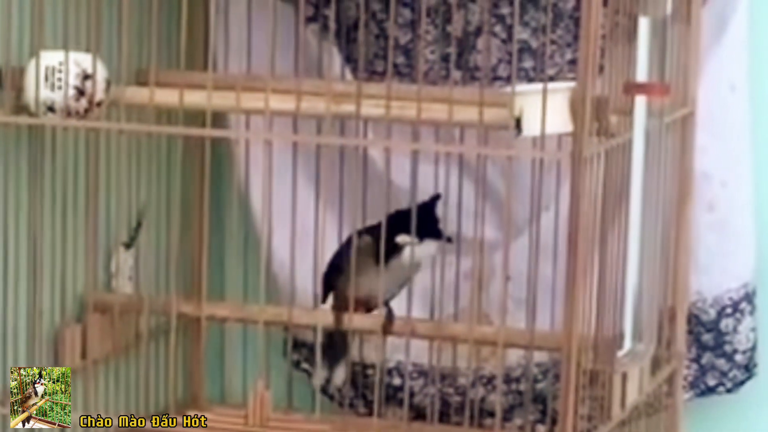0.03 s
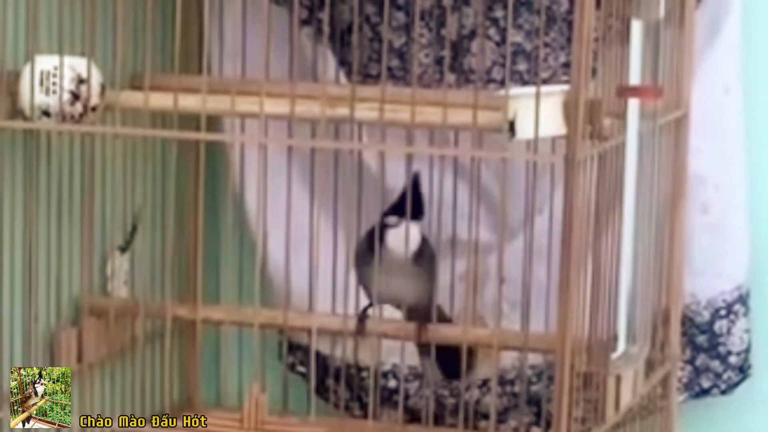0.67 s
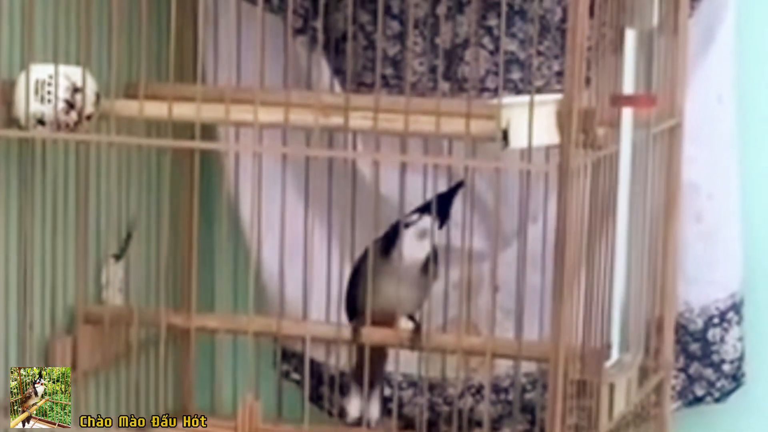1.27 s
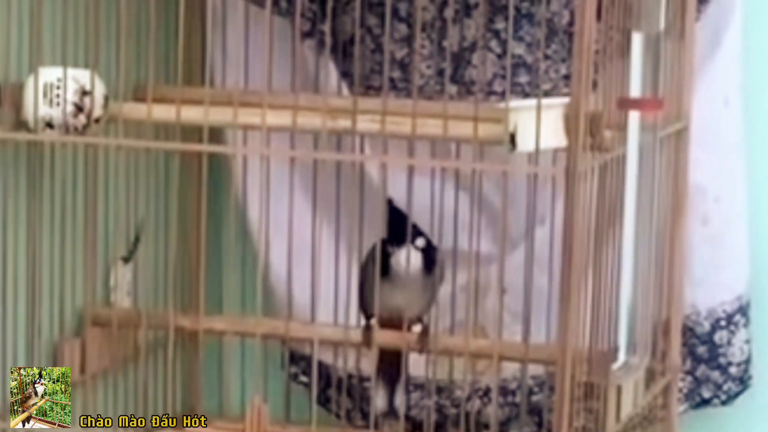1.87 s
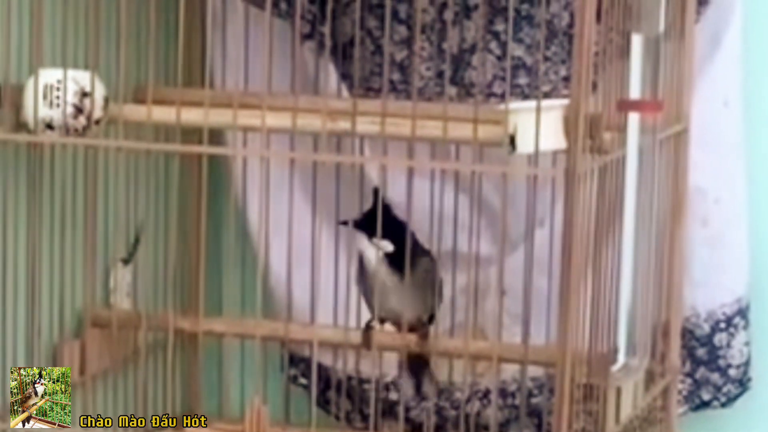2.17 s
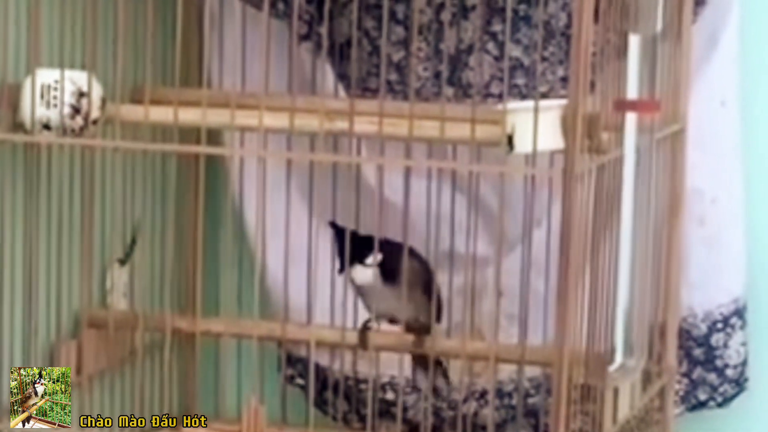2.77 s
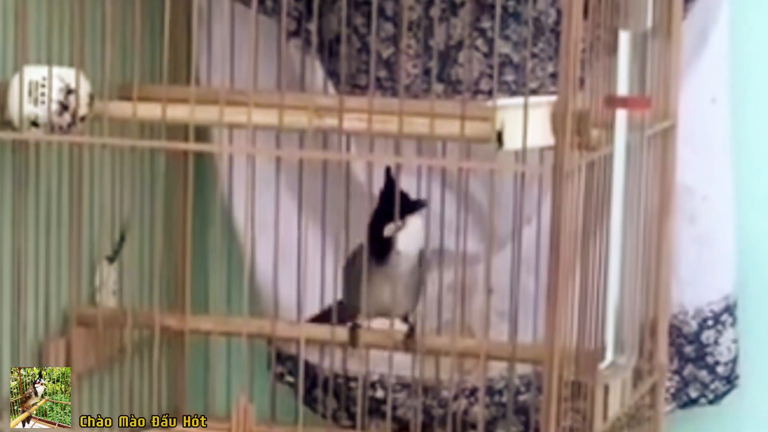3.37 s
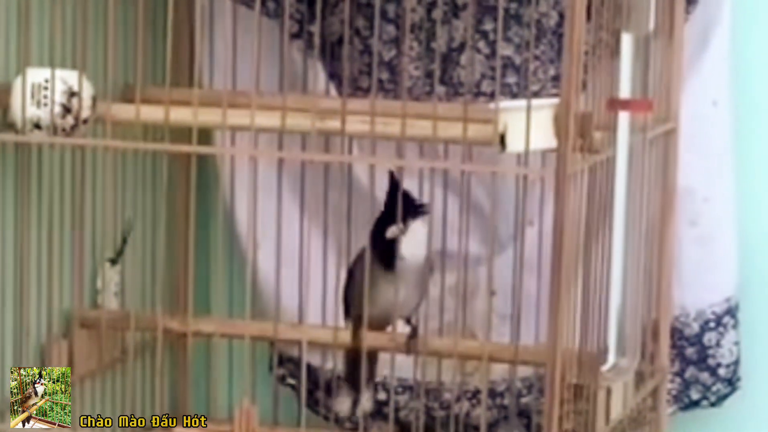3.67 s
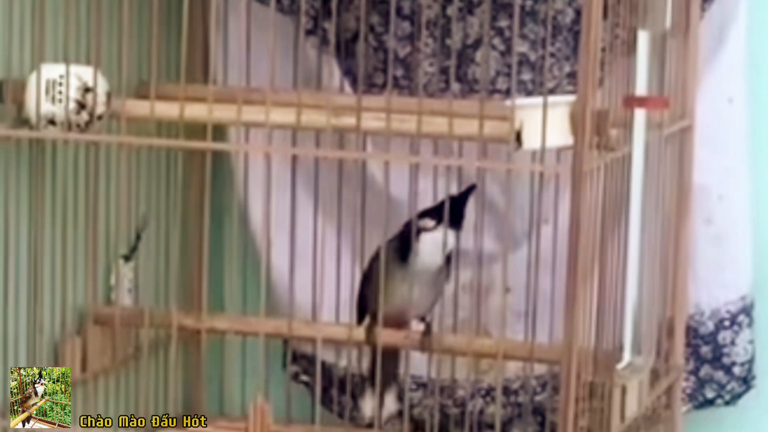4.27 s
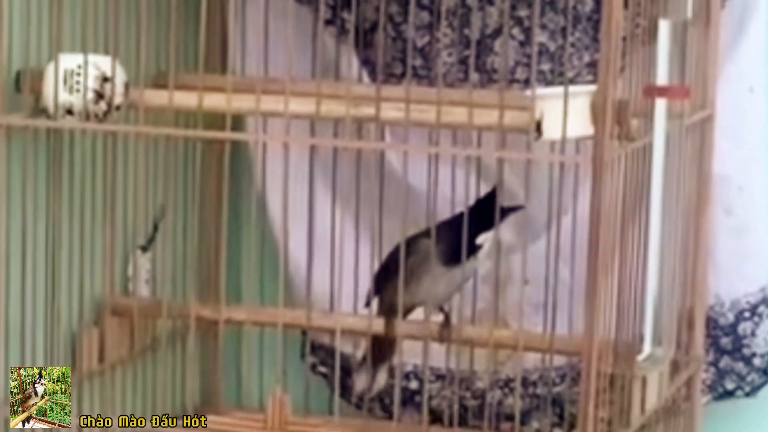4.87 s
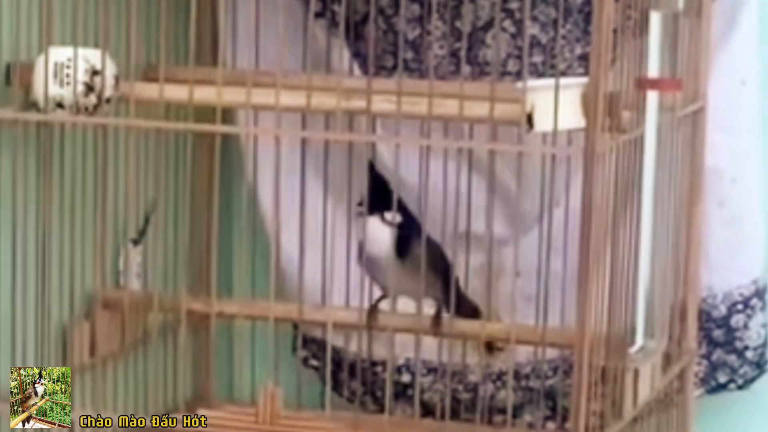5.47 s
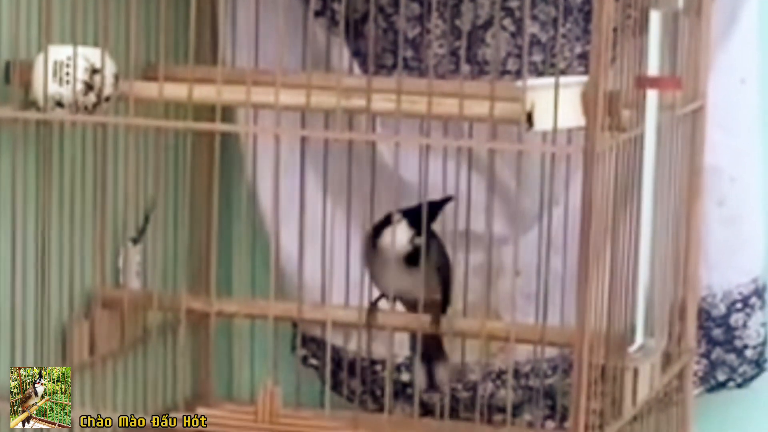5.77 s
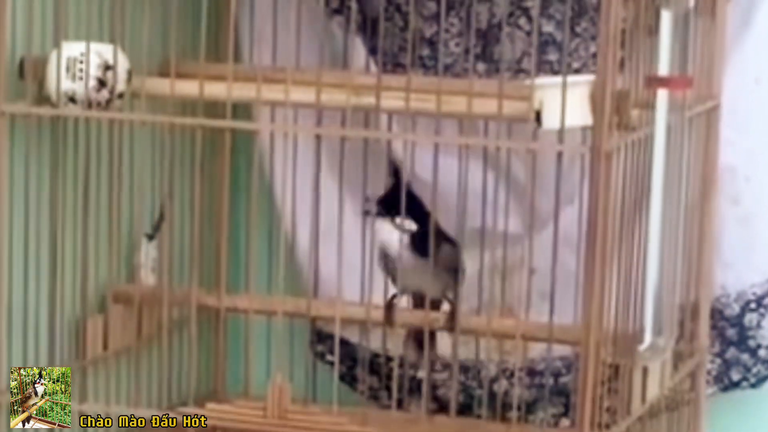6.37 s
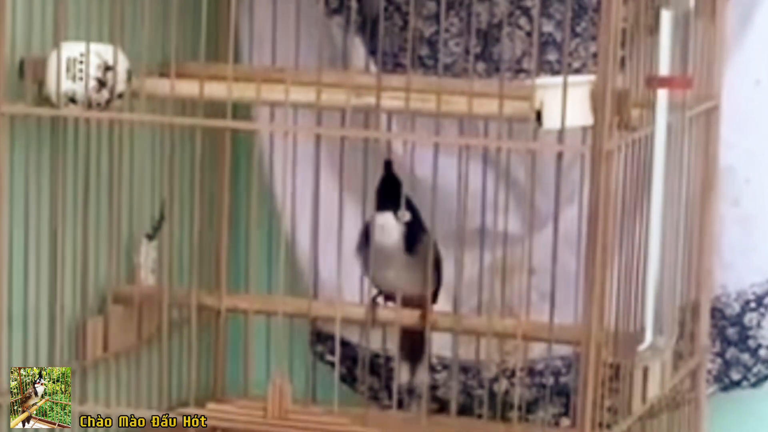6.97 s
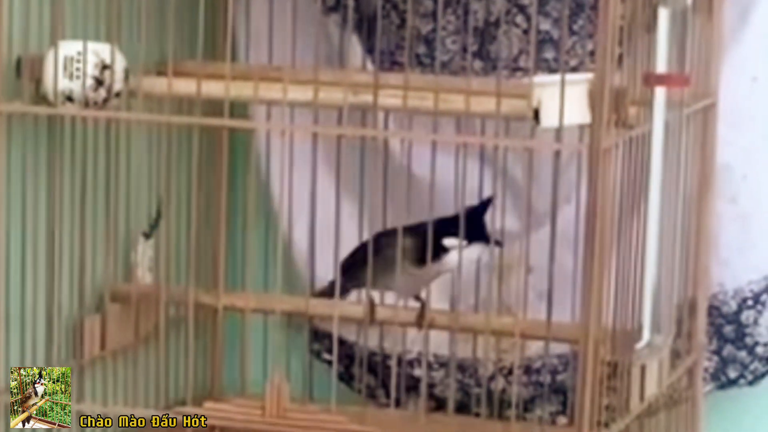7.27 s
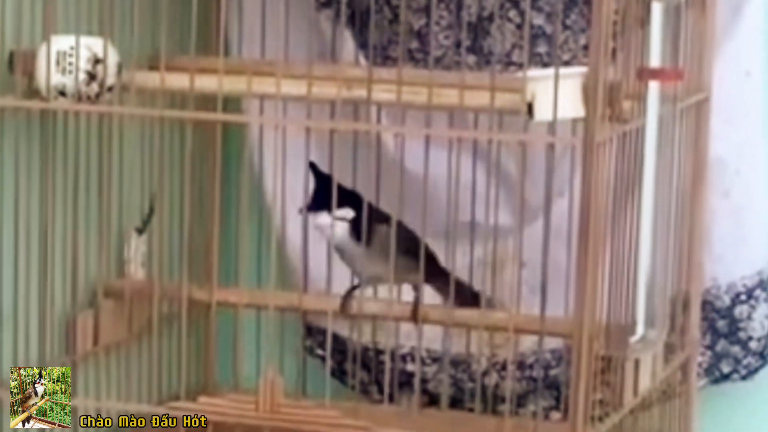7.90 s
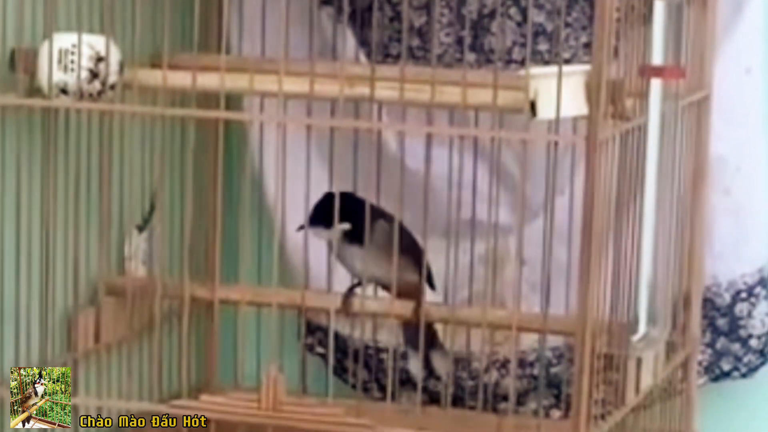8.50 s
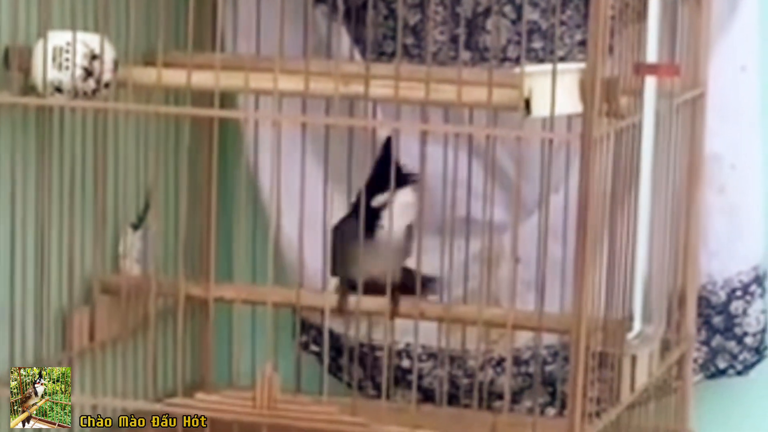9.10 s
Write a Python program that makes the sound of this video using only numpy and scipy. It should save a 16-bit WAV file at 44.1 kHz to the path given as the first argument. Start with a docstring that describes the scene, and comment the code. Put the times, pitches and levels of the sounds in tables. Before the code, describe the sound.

A caged songbird sings loud, short phrases of sliding whistles close by, while other birds answer over faint traffic.

```python
"""A caged bulbul sings short phrases of sliding, trilled whistles close by.
Its voice organ, the syrinx, makes an almost pure tone that gets louder as it goes higher.
A neighbouring bird and a far one answer through an echoing hall, over a low haze of traffic.
Near the end, claws tick faintly on the cage. A limiter (an automatic volume control)
turns the haze down under loud notes and lets it swell back with the echo."""
import sys
import numpy as np
from scipy import signal
from scipy.fft import rfft
from scipy.io import wavfile
from scipy.ndimage import uniform_filter1d, minimum_filter1d

SR = 44100
rng = np.random.default_rng(int(sys.argv[2]) if len(sys.argv) > 2 else 0)


def wrap_up_sound(samples):
    """Save the sound to the file named by the first command line argument, as 16-bit audio."""
    columns = np.atleast_2d(samples).T
    # keep every value between -1 and 1, then stretch to whole-number steps
    tamed = np.clip(columns, -1, 1)
    steps = np.round(tamed * 32767).astype(np.int16)
    wavfile.write(sys.argv[1], SR, steps)


N = 407484

# Scoops are notes that leap from a bird's resting pitch towards a top pitch. Each row: start in seconds,
# length in seconds, top pitch in Hz, rise time in seconds, base level in dB, base trill depth in Hz.
FAR_SCOOP_NOTES = [ (-.13, 0.19, 3516, .03, 1.6, 37.8), (.108, .167, 3313, .032, 6.6, 60), ]
NEIGHBOUR_SCOOP_NOTES = [ (0.508, 0.067, 3777, 0.023, 11.9, 222), (1.982, 0.13, 3264, .013, 4.5, 399),
                         (2.313, 0.16, 3500, .026, 6.3, 324), (2.504, 0.059, 2970, 0.027, 3.8, 325),
                         (2.645, .07, 3396, 0.031, 9.9, 406), (2.85, .054, 3610, .02, 11.1, 60), ]
CAGED_SCOOP_NOTES = [ (0.883, 0.093, 2682, .013, 16.5, 133), (1.115, 0.031, 3270, .004, 18.5, 9.8),
                     (1.204, 0.074, 2503, 0.018, 14.5, 81), (3.52, 0.09, 3896, 0.048, 14.5, 500),
                     (3.782, 0.058, 2550, 0.023, 13.5, 220), (6.602, 0.041, 3426, .011, 18.5, 62),
                     (6.879, .055, 2220, 0.0076, 15.5, 13), ]
# Slurs are notes that slide from one pitch to another. Each row: start in seconds, length in seconds,
# first pitch in Hz, last pitch in Hz, base level in dB, base trill depth in Hz.
FAR_SLUR_NOTES = [ (-.1, .17, 2496, 2352, -2.5, 201.5), (.17, 0.21, 2126, 1950, -10, 129),
                  (0.309, 0.085, 2666, 2814, 2, 219), (.42, .1, 1914, 2434, 3, 281),
                  (1.782, 0.064, 1044, 964, -20, 26), (4.21, 0.083, 3015, 3254, 3, 130),
                  (4.311, 0.067, 2913, 3130, 7.5, 196), (4.33, 0.1, 2268, 2050, -3.5, 189.5),
                  (4.452, .058, 3450, 3430, 8.5, 44.5), (4.505, .105, 3640, 3456, 4.5, 337),
                  (4.58, 0.051, 2178, 2274, 5.5, 133.5), (4.621, 0.13, 2702, 2615, 3.5, 232),
                  (4.746, 0.033, 1740, 1596, -1, 87), (6.169, 0.011, 3750, 1830, -9, -3),
                  (6.174, 0.024, 2566, 2580, -10, -11), (6.489, 0.11, 3187, 3315, 9.5, 55.5),
                  (6.697, 0.084, 2445, 2710, 8.5, 347.5), (6.84, 0.12, 3240, 3347, 1, 421.5),
                  (7.02, .16, 2173, 1790, 0, 260.5), ]
NEIGHBOUR_SLUR_NOTES = [ (2.371, 0.064, 2252, 2120, 1, 213), (2.49, 0.0339, 1688, 2170, -6, 122),
                        (2.61, 0.071, 2310, 2174, -4, 200), (2.775, .075, 2122, 1908, -0.5, 275),
                        (8.861, .034, 2360, 2910, 14, 323), (8.893, .065, 3050, 3550, 16.5, 416), ]
CAGED_SLUR_NOTES = [ (1.021, 0.031, 1910, 1936, 13, -1), (1.044, 0.028, 2300, 2232, 16, 24),
                    (1.11, 0.01, 3120, 2300, 7, 0), (1.146, 0.03, 3600, 3290, 15, 117),
                    (1.278, 0.12, 2046, 1432, 14, 14), (3.829, 0.021, 2700, 2810, 14, 168),
                    (3.893, 0.06, 2463, 2426, 15.5, 150), (3.976, .034, 1470, 2576, 16.5, 127),
                    (4.014, 0.021, 3117, 3230, 17.5, 291), (4.091, 0.058, 3280, 3188, 16, 74),
                    (4.142, 0.057, 2626, 2485, 15.5, 161), (4.194, 0.043, 2046, 1980, 13.5, 23),
                    (5.529, 0.0084, 1470, 2890, 4.5, 16), (5.54, 0.029, 3210, 3175, 13, 11),
                    (5.562, 0.03, 3540, 2727, 16, 175), (5.592, 0.037, 2720, 2650, 17, 7),
                    (6.378, .06, 1775, 3160, 10, 296), (6.437, 0.058, 2827, 2650, 16.5, 225),
                    (6.53, 0.014, 2160, 2310, 14.5, 170), (6.706, .012, 3390, 3920, 15.5, 250),
                    (6.712, 0.012, 4370, 3900, 5.5, 30), (6.726, 0.0716, 3514, 3250, 7, 333),
                    (6.789, 0.061, 3078, 3343, 15.5, 149), (6.938, 0.0364, 2544, 2715, 15, 168),
                    (6.972, 0.052, 1792, 1688, 12.5, 22), (7.968, 0.051, 1260, 2066, 6, 9),
                    (7.996, 0.087, 1841, 1397, 0, 7), (8.083, .009, 2700, 1720, 0.5, -7),
                    (9.174, 0.048, 2010, 2346, 17, 185), (9.227, 0.021, 2520, 3060, 16, 200), ]
# Overtones are faint tones at multiples of a whistle's pitch.
# Each row: frequency in Hz, base level in dB compared with the whistle.
OVERTONE_LEVELS = [(2700, -15), (4200, -42), (7000, -35.5), (8500, -39), (9900, -28), (11200, -32),
                   (14000, -37.5), (16000, -46.5)]
# First bounces off the cage floor and the wall.
# Each row: delay in seconds, level in dB compared with the direct sound.
FIRST_BOUNCES = [(.0023, -44), (.0061, -11.5)]
# How long the porch and the hall echo. Each row: frequency in Hz, seconds to fade by 60 dB.
PORCH_ECHO_TIMES = [(1500, 0.25), (3200, 0.3), (12000, 0.13)]
HALL_ECHO_TIMES = [(1500, 1.57), (2500, 1.68), (3600, 1.26), (7000, 0.47), (14000, 0.53)]
# The traffic's balance of low and high sound. Each row: frequency in Hz, relative level in dB.
TRAFFIC_COLOUR = [(24, -4.5), (42, 3), (140, 1.5), (250, -4), (330, -10), (500, -11.5), (750, -16.5),
                  (1300, -17.5), (2000, -20.5), (3200, -34), (5000, -41.5), (8500, -44.5), (11000, -52),
                  (16000, -44.5)]
# How the traffic's rumble swells and sinks. Each row: time in seconds, base level in dB.
TRAFFIC_SWELL = [(0, -27.5), (1.8, -24), (3.3, -23), (4.6, -23.5), (5.4, -17), (6.2, -23), (7.4, -26.5),
                 (8.3, -23.5), (9.2, -20.5)]
# Claws on the perch and bars. Each row: time in seconds, base level in dB, ringing pitch in Hz.
CLAW_TICKS = [(7.922, -48, 11450), (8.745, -47, 10300)]

FAR_REST_HZ, NEIGHBOUR_REST_HZ, CAGED_REST_HZ = 2120, 1950, 1344  # where each bird's scoops begin
EFFORT_DB_PER_OCTAVE = 15.5  # air pressure raises pitch and loudness together
FADE_DB, FLUTTER_DB = 7, 2  # each note weakens towards its end and wavers in strength
TRILL_PER_S, TRILL_PER_S_PER_HZ = 90, .085  # the wider a trill, the faster it beats
TRILL_OPENING, PULSING = 1.52, .65  # a trill widens near the note's top pitch and pulses in loudness
EVEN_DB = -1  # even overtones are weaker than odd ones
FULL_VOICE_DB, PURITY = 10, 0.39  # overtones lose an extra PURITY dB for each dB below full voice


def amp(db):
    """Turns decibels (dB) into a number to multiply a sound by."""
    return 10 ** (np.asarray(db) / 20)


def unit(x):
    """Scales a signal so that its typical size (root mean square) is 1."""
    return x / np.sqrt(np.mean(x ** 2) + 1e-20)


def look_up(table, hz):
    """Reads a table at any frequency, blending between rows on a musical pitch scale."""
    row_hz, values = np.transpose(table)
    return np.interp(np.log(hz + 1), np.log(row_hz), values)


def add(mix, start_s, sound):
    """Adds a sound to the mix at a time in seconds."""
    part = mix[max(round(start_s * SR), 0):][:len(sound)]
    part += sound[:len(part)]


def wander(t, samples):
    """A smooth random wobble that changes over about this many samples."""
    return unit(uniform_filter1d(uniform_filter1d(rng.standard_normal(len(t)), samples), samples))


def scoop(rest_hz, start, length, top_hz, rise_s, level_db, depth_hz, bend=1.1):
    """The pitch hesitates at rest, leaps, then eases towards its top."""
    t = np.arange(0, length, 1 / SR)
    pitch = top_hz + (rest_hz - top_hz) * np.exp(-(t / rise_s) ** bend)
    return start, pitch, level_db, depth_hz


def slur(start, length, from_hz, to_hz, level_db, depth_hz, bend=1.5, sharp=0.078, flick_s=0.0026):
    """The note starts a little high, drops onto its first pitch, lingers, then slides to the last."""
    t = np.arange(0, length, 1 / SR)
    slide = from_hz + (to_hz - from_hz) * (t / length) ** bend
    flick = 1 + sharp * np.exp(-t / flick_s)
    return start, slide * flick, level_db, depth_hz


def whistle(pitch, level_db, depth_hz, jitter=0.0053, sag=.42, flicker_db=4, rasp_db=-54,
            attack_s=0.0031, release_s=0.0015):
    """The syrinx sweeps an almost pure tone while a fast trill shakes its pitch and strength."""
    t = np.arange(len(pitch)) / SR
    height = np.minimum(pitch / np.percentile(pitch, 90), 1)  # 1 near the note's top pitch
    db = level_db + EFFORT_DB_PER_OCTAVE * np.log2(height) - FADE_DB * (t / t[-1]) ** 2
    db += FLUTTER_DB * wander(t, samples=90)
    depth = depth_hz * height ** TRILL_OPENING
    trill_rate = (TRILL_PER_S + TRILL_PER_S_PER_HZ * depth_hz) * (1 + 0.11 * wander(t, samples=400))
    trill = np.sin(2 * np.pi * np.cumsum(trill_rate) / SR)
    hz = pitch * (1 + jitter * wander(t, samples=100))
    hz += depth * (trill - sag)  # the trill dips more than it lifts
    phase = 2 * np.pi * np.cumsum(hz) / SR
    tone = np.sin(phase) + amp(rasp_db) * rng.standard_normal(len(t))
    for k in range(2, 9):  # weak overtones leak past the throat, each flickering by itself
        overtone_db = look_up(OVERTONE_LEVELS, k * abs(hz)) + EVEN_DB * (k % 2 == 0)
        overtone_db += PURITY * (db - FULL_VOICE_DB)
        overtone_db += flicker_db * wander(t, samples=150)
        tone += amp(overtone_db) * (k * hz < SR / 2) * np.sin(k * phase)
    throb = 1 + PULSING * np.tanh(depth / 300) * trill
    fade = np.clip(np.minimum(t / attack_s, (t[-1] - t) / release_s), 0, 1)
    return amp(db) * throb * np.sin(fade * np.pi / 2) ** 2 * tone


def birdsong(rest_hz, scoops, slurs, swell_db, swell_share):
    """One bird's notes. Each starts swell_db softer and gains most of that in its first swell_share."""
    notes = [scoop(rest_hz, *row) for row in scoops] + [slur(*row) for row in slurs]
    song = np.zeros(SR + N)  # one extra second in front lets a song begin before time zero
    for start, pitch, level_db, depth_hz in notes:
        progress = np.linspace(0, 1, len(pitch))
        swell = amp(-swell_db * np.exp(-progress / swell_share))
        add(song, start + 1, whistle(pitch, level_db, depth_hz) * swell)
    return song


def echo(echo_times, rise_s):
    """Many reflections blur into a tail of noise in which each frequency dies at its own speed."""
    hz, t, bands = signal.stft(rng.standard_normal(2 * SR), SR, nperseg=256)
    decay = amp(-60 * t / look_up(echo_times, hz)[:, None])
    build_up = 1 - np.exp(-t / rise_s)
    tail = signal.istft(bands * decay * build_up, SR, nperseg=256)[1]
    song_band = abs(rfft(tail, SR))[1500:4000]  # the birds' main range in Hz
    return tail / np.sqrt(np.mean(song_band ** 2))


def through_hall(song, direct_db, porch_db, hall_db, bright_db, beam_db=-3):
    """A song arrives straight from the bird, off the nearby porch walls, and through the long hall."""
    low = signal.sosfiltfilt(signal.butter(6, 4800, fs=SR, output="sos"), song)
    high = song - low  # overtones beam past the microphone and come back off the walls
    direct = low + amp(beam_db) * high
    near = direct.copy()
    for delay_s, db in FIRST_BOUNCES:
        add(near, delay_s, amp(db) * direct)
    porch = amp(porch_db) * echo(PORCH_ECHO_TIMES, rise_s=0.00033)
    hall = amp(hall_db) * echo(HALL_ECHO_TIMES, rise_s=0.0031)
    echoes = signal.fftconvolve(low + amp(bright_db) * high, porch + hall)[:len(song)]
    return (amp(direct_db) * near + echoes)[SR:]  # drop the extra second


def traffic(patchy_db=3.0, base_db=-25.5, bass_hz=60, rumble_hz=1500):
    """Traffic blends into a low haze with drifting patches. Its rumble swells; its hiss stays even."""
    hz, t, bands = signal.stft(rng.standard_normal(N), SR, nperseg=2048, noverlap=1536)
    hz = hz[:, None]
    speckle = rng.standard_normal(bands.shape)
    patches = unit(uniform_filter1d(uniform_filter1d(speckle, 5, axis=0), 9, axis=1))
    # the swell acts mostly between bass_hz and rumble_hz
    rumble_share = hz ** 2 / (hz ** 2 + bass_hz ** 2) / (1 + (hz / rumble_hz) ** 2)
    swell_db = (np.interp(t, *np.transpose(TRAFFIC_SWELL)) - base_db) * rumble_share
    colour = unit(amp(look_up(TRAFFIC_COLOUR, hz)))
    bands *= colour * amp(base_db + swell_db + patchy_db * patches)
    return signal.istft(bands, SR, nperseg=2048, noverlap=1536)[1][:N]


def claws(length_s=0.0089, width_hz=1500):
    """Claws scratch the cage, which rings with tiny, soft, bright ticks."""
    ticks, t = np.zeros(N), np.arange(0, length_s, 1 / SR)
    for middle_s, db, hz in CLAW_TICKS:
        ring = t * np.exp(-np.pi * width_hz * t) * np.sin(2 * np.pi * hz * t)
        scratch = unit(signal.fftconvolve(rng.standard_normal(len(t)), ring)[:len(t)])
        add(ticks, middle_s - length_s / 2, amp(db) * scratch * np.hanning(len(t)))
    return ticks


def limiter(sound, ceiling_db, recovery_db_per_s):
    """Turns the volume down within a millisecond at a loud peak, then steadily back up."""
    over_db = np.maximum(20 * np.log10(abs(sound) + 1e-9) - ceiling_db, 0)
    recovery_db = np.arange(N) * recovery_db_per_s / SR
    cut_db = np.maximum.accumulate(over_db + recovery_db) - recovery_db
    return sound * amp(uniform_filter1d(minimum_filter1d(-cut_db, size=41), size=41))


def scene():
    """Three birds at three distances, with the traffic and the claws, in one channel."""
    caged = birdsong(CAGED_REST_HZ, CAGED_SCOOP_NOTES, CAGED_SLUR_NOTES, swell_db=11.5, swell_share=0.18)
    neighbour = birdsong(NEIGHBOUR_REST_HZ, NEIGHBOUR_SCOOP_NOTES, NEIGHBOUR_SLUR_NOTES,
                         swell_db=3.5, swell_share=0.055)
    far = birdsong(FAR_REST_HZ, FAR_SCOOP_NOTES, FAR_SLUR_NOTES, swell_db=6.5, swell_share=0.15)
    birds = (through_hall(caged, direct_db=-4.5, porch_db=-9.5, hall_db=-28, bright_db=1)
             + through_hall(neighbour, direct_db=-9, porch_db=-4.0, hall_db=-23, bright_db=-2.5)
             + through_hall(far, direct_db=-12.5, porch_db=-16, hall_db=-3, bright_db=0.5))
    return (birds + traffic() + claws())[None]


def record(dry):
    """The microphone loses deep bass, two limiters and a clip hold the peaks, and the top treble goes."""
    lowest_hz, highest_hz = 34, 15700
    heard = signal.sosfilt(signal.butter(4, lowest_hz, "high", fs=SR, output="sos"), dry[0])
    levelled = limiter(heard, ceiling_db=0.55, recovery_db_per_s=50.5)
    limited = limiter(levelled, ceiling_db=0.4, recovery_db_per_s=598.5)
    treble_cut = signal.firwin(301, highest_hz, window=("kaiser", 7), fs=SR)
    return signal.oaconvolve(np.clip(limited, -1, 1), treble_cut, "same")[None]


dry = scene()
out = record(dry)
wrap_up_sound(out)
```